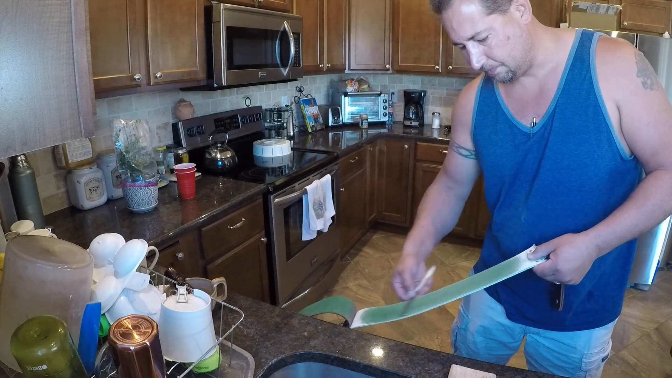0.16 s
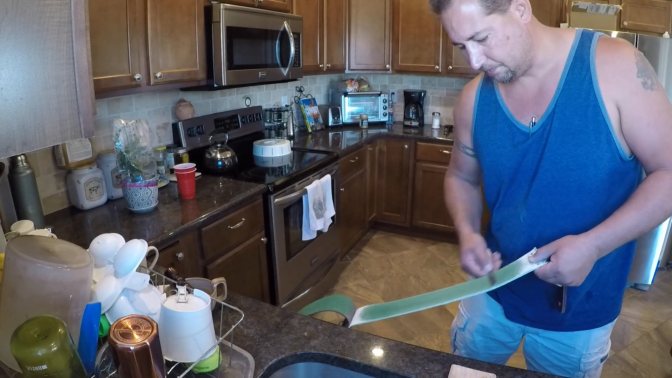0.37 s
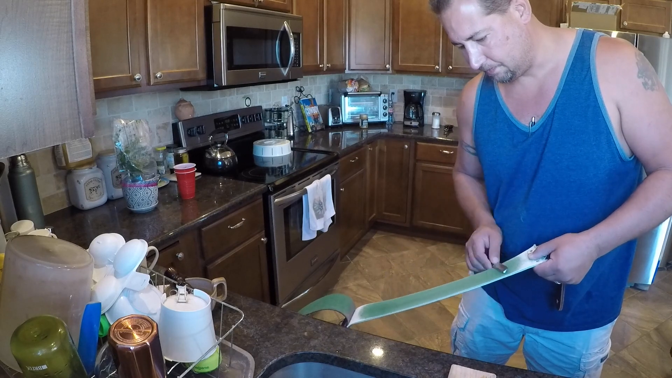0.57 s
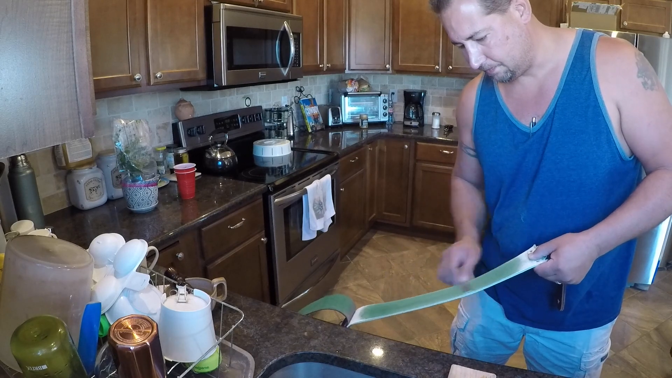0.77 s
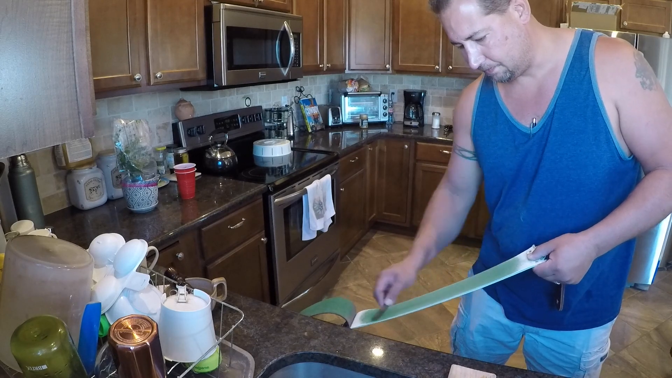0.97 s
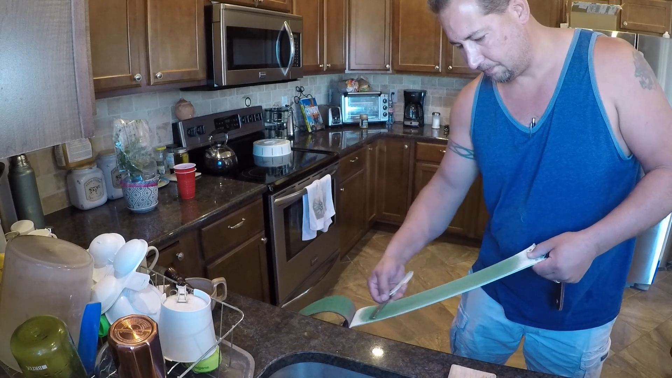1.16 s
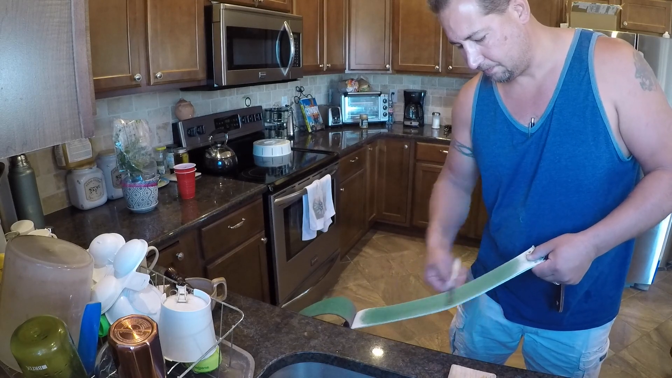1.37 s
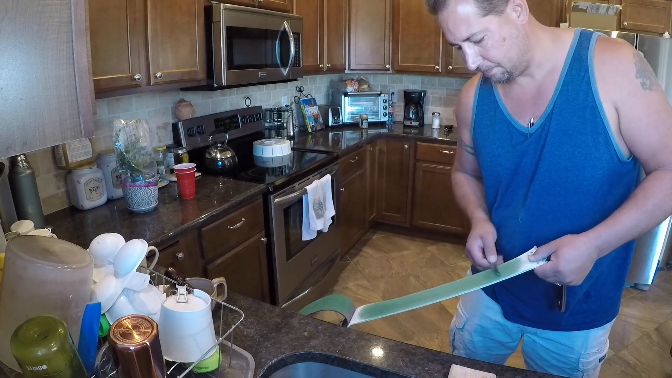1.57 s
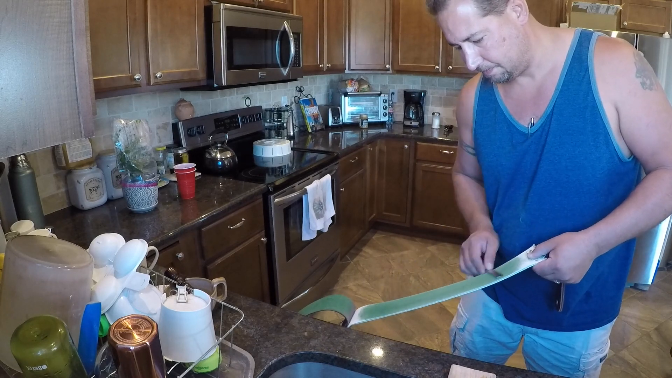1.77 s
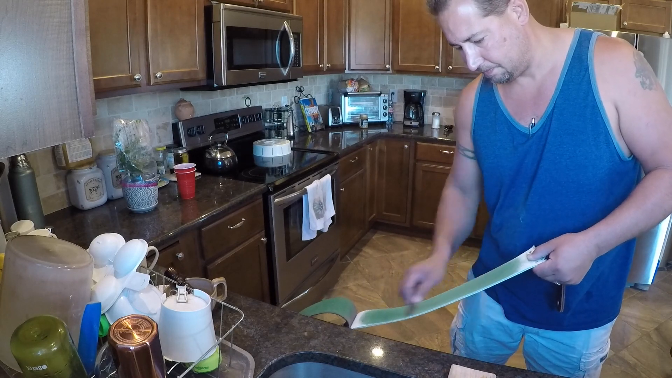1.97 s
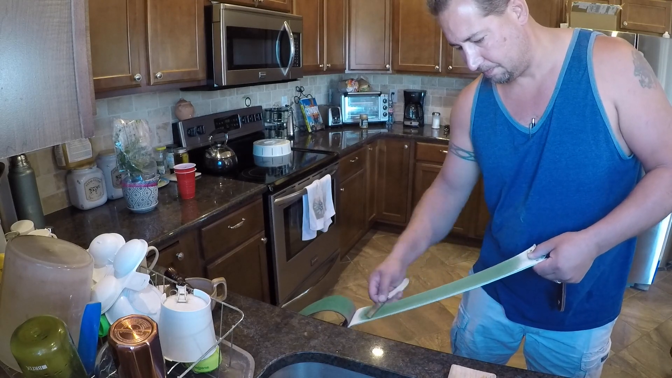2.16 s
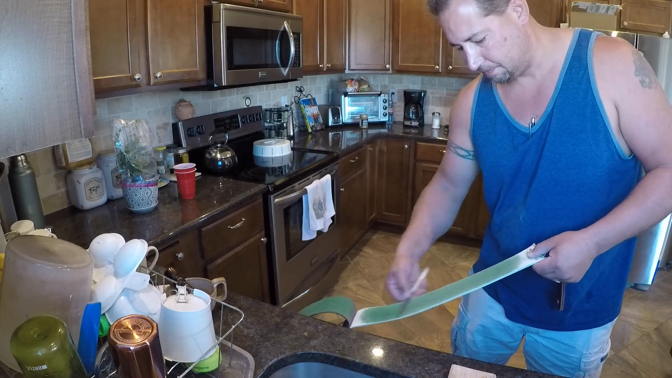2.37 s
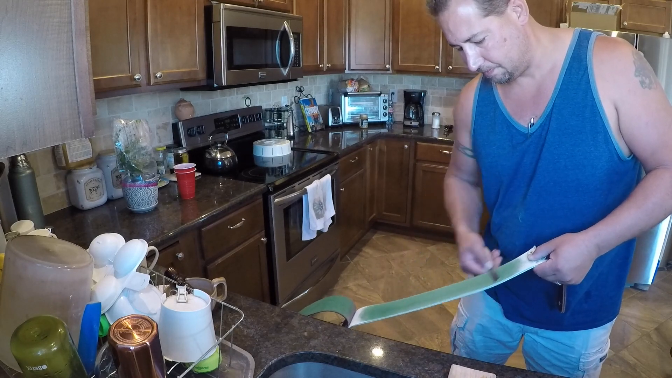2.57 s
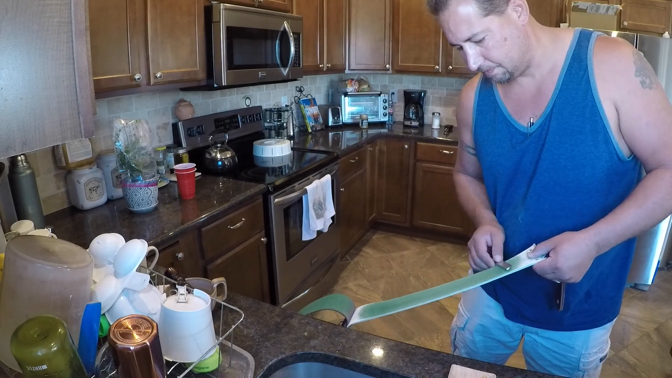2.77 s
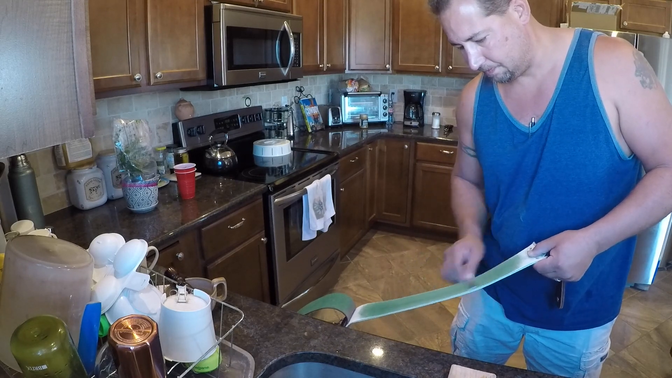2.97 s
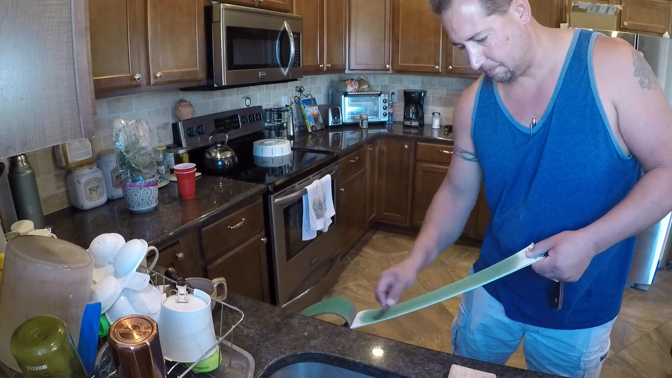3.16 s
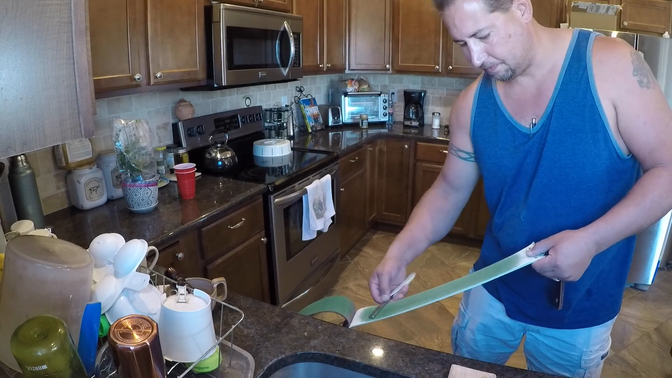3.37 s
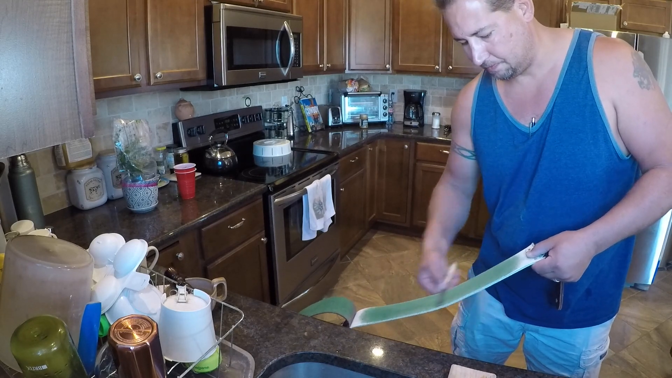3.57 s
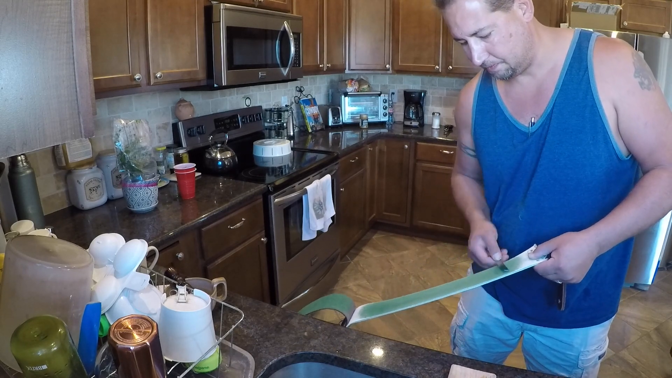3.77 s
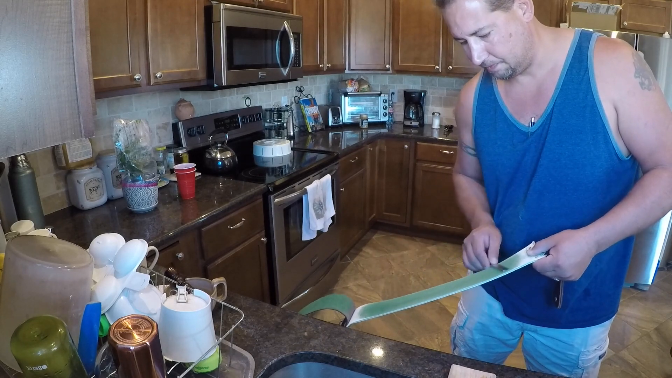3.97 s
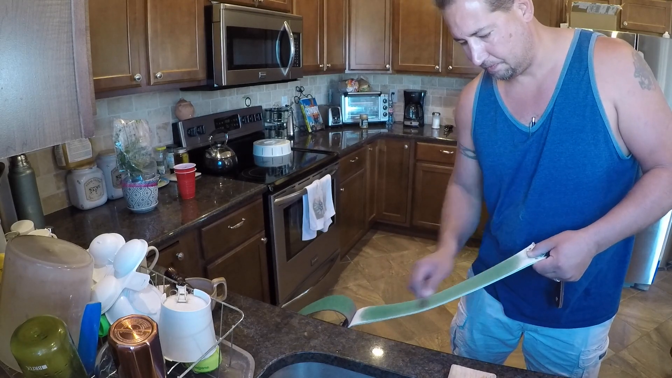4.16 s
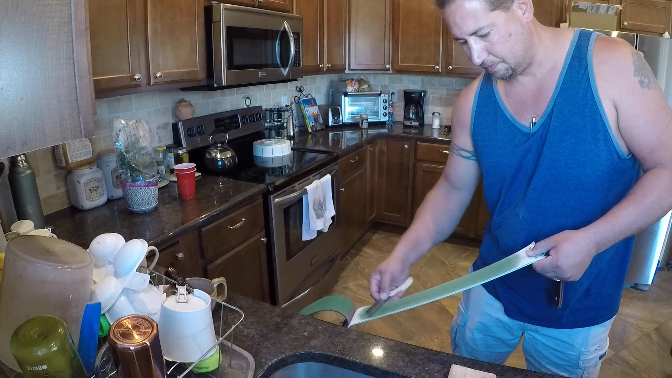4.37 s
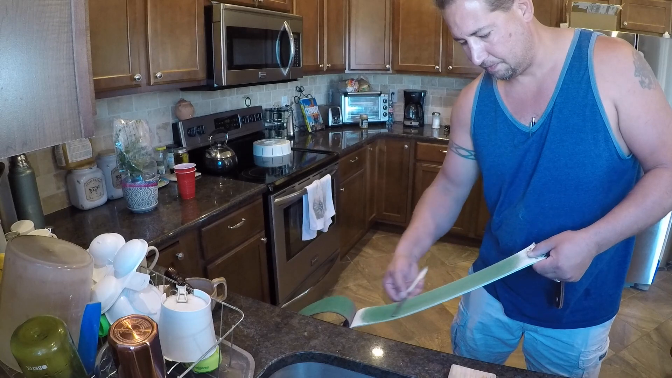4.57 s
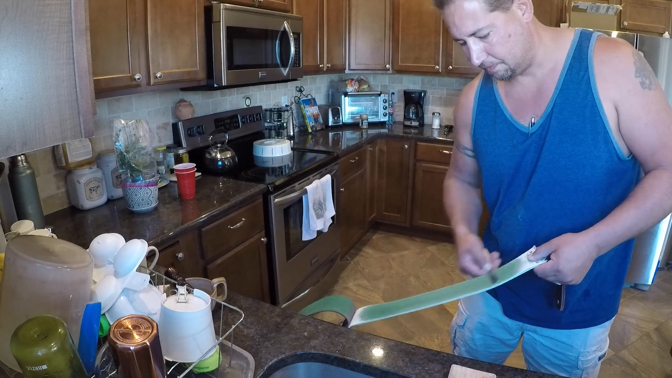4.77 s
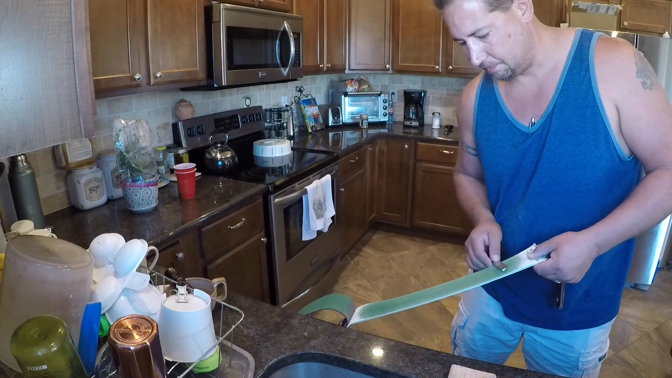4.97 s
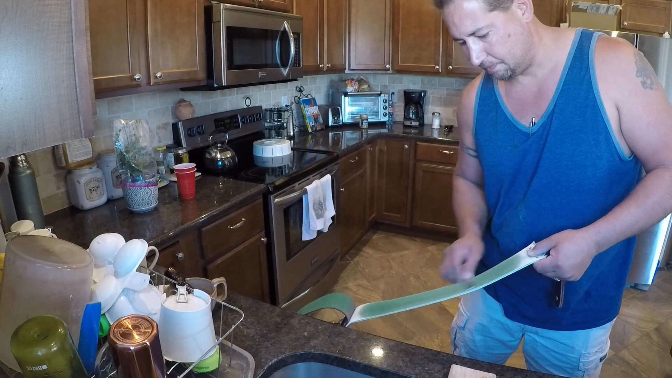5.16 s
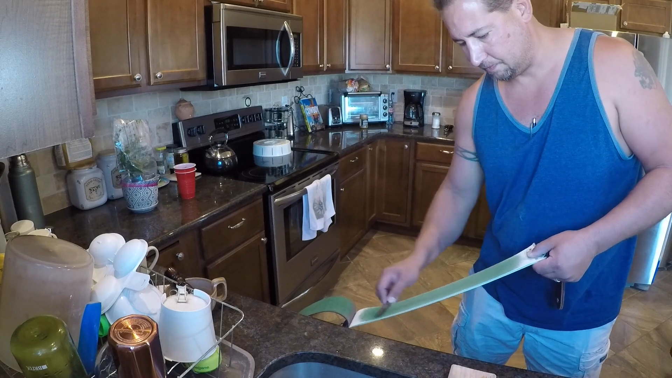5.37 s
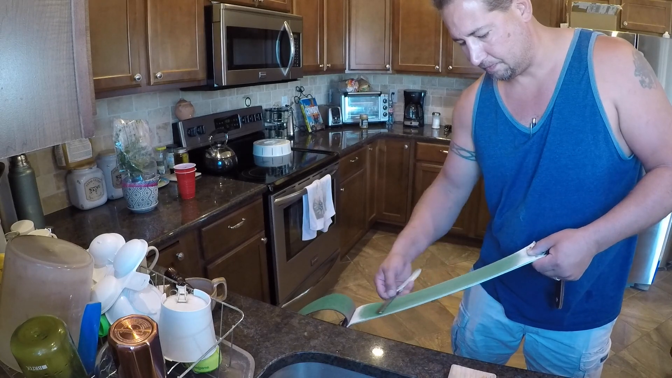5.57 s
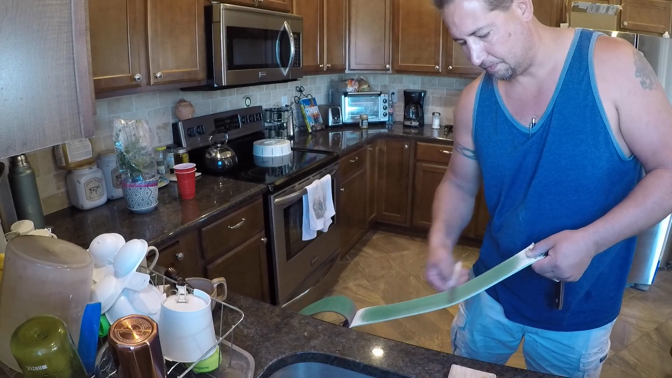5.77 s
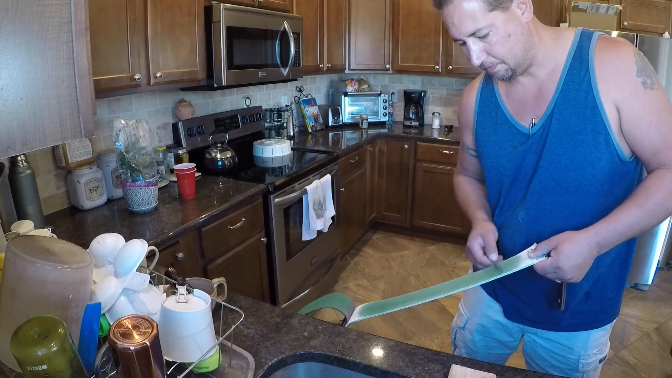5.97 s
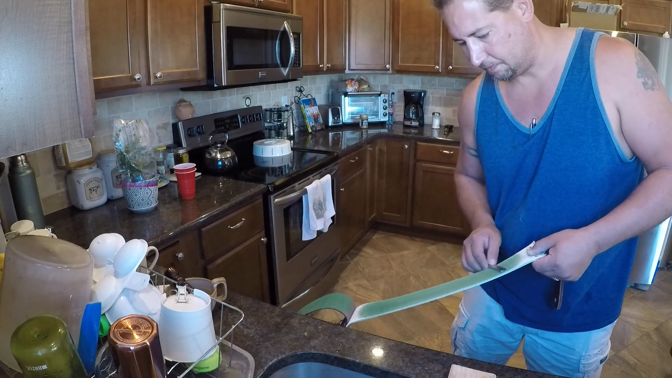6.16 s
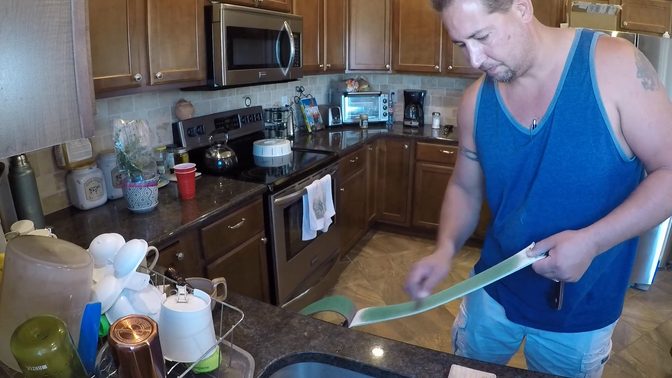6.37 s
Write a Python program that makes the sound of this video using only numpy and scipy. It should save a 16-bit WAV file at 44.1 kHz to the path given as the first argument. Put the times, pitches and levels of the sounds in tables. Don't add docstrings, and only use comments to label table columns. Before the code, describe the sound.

A straight razor is stropped on taut canvas in steady alternating strokes, raspy and hissing with short zips, in a humming hard-walled kitchen.

```python
import sys
import numpy as np
from scipy import signal
from scipy.fft import rfft, irfft, next_fast_len
from scipy.io import wavfile
from scipy.ndimage import uniform_filter1d

SR = 44100
rng = np.random.default_rng(int(sys.argv[2]) if len(sys.argv) > 2 else 0)


def wav_record(signal):
    frames = np.transpose(np.atleast_2d(signal))
    bounded = np.clip(frames, -1, 1)
    quanta = np.round(bounded * 32767).astype(np.int16)
    wavfile.write(sys.argv[1], SR, quanta)


def volts(x):
    e = np.asarray(x, float) / 20
    return 10 ** e


N = 283563
TIME = np.arange(N) / SR


def level(x, db):
    return x * volts(db) / np.sqrt(np.mean(x ** 2))


def along(table, hz):
    points = np.array(table, float)
    return np.interp(np.log(np.maximum(hz, 1)), np.log(np.maximum(points[:, 0], 1)), points[:, 1])


def colour(x, table, share=1):
    length = x.shape[-1]
    size = next_fast_len(length)
    gain = volts(share * along(table, np.fft.rfftfreq(size, 1 / SR)))
    return irfft(rfft(x, size) * gain, size)[..., :length]


def bands(x, count=16, low_hz=80):
    size = next_fast_len(len(x))
    centres = np.geomspace(low_hz, 15000, count)
    place = np.interp(np.log(np.fft.rfftfreq(size, 1 / SR) + 1), np.log(centres), np.arange(count))
    spectrum = rfft(x, size)
    split = []
    for k, hz in enumerate(centres):
        weight = np.clip(1 - abs(place - k), 0, 1)
        split.append((hz, irfft(spectrum * weight, size)[:len(x)]))
    return split


def walk(rate):
    hold = int(SR / rate)
    steps = np.repeat(rng.standard_normal(N // hold + 1), hold)
    return 1.3 * uniform_filter1d(uniform_filter1d(steps, hold), hold)[:N]


# frequency in Hz, density in dB per Hz.
AIR_MID = [(20, -15), (70, -34), (100, -27), (120, -18), (150, 6), (200, 5), (300, -3.5), (450, -6.5),
           (850, -14), (2600, -20.5), (4900, -26.5), (7200, -23.5), (10000, -26), (15000, -36.5)]
# frequency in Hz, density in dB per Hz.
AIR_SIDE = [(20, -21), (95, -34), (120, -11), (160, 7), (230, 2.5), (620, 0), (1240, -3.5), (2000, -12),
            (4300, -26), (7000, -19), (10800, -23), (12300, -41), (14500, -34)]


def air():
    layers = []
    for table, db in (AIR_MID, -51), (AIR_SIDE, -50.5):
        noise = level(colour(rng.standard_normal(N), table), db)
        layers.append(sum(volts(0.7 * walk(5)) * band for hz, band in bands(noise, count=7)))
    return layers


def motor_hum():
    hz = 57.2 * (1 + 0.045 * walk(10))
    return volts(-71.5 + 1.9 * walk(7.45)) * np.sin(2 * np.pi * np.cumsum(hz) / SR)


# frequency in Hz, decay by 60 dB in seconds.
KITCHEN = [(300, 0.38), (1000, 0.5), (2500, 0.33), (5000, 0.67), (10000, 0.33)]


def echo(x):
    t = TIME[:SR // 2]
    noise = rng.standard_normal(len(t))
    tail = sum(band * volts(-60 * t / along(KITCHEN, hz)) for hz, band in bands(noise, count=8))
    tail = tail * np.clip((t - 0.003) / 0.0026, 0, 1)
    return signal.fftconvolve(x, tail / np.sqrt(np.sum(tail ** 2)))[:N]


# frequency in Hz, gain in dB.
ECHO_MID = [(300, -4), (800, -1.5), (1600, 0), (2400, -2.5), (4000, -2), (8000, -6)]
# frequency in Hz, gain in dB.
ECHO_SIDE = [(200, -31), (500, -3), (1000, 1), (2000, 0), (4000, -5), (8000, -0.5), (12000, -7)]


def reflections(razor):
    wall = np.concatenate([np.zeros(int(0.03 * SR)), razor])[:N]
    mid = colour(volts(-10) * wall + echo(razor), ECHO_MID)
    return mid, volts(-1.5) * colour(echo(razor), ECHO_SIDE)


# frequency in Hz, gain in dB.
BEAM = [(300, -4), (800, -2.5), (1600, -5.5), (2400, 2.5), (4000, 1), (8000, -4)]


def direct(razor):
    return colour(razor, BEAM)


# landing in seconds, start of unloading
# in seconds, gliding level in dB, level of the final dig in dB, top pitch of the rasp in Hz.
STROKES = [(.04, .324, -42, -42.5, 1080), (.62, .83, -49, -31, 1300), (1.16, 1.43, -41, -41.5, 1160),
           (1.71, 1.946, -44, -33.5, 1590), (2.27, 2.512, -44, -34.5, 1250), (2.82, 3.05, -44.5, -34, 1320),
           (3.39, 3.654, -38, -44.5, 1254), (3.94, 4.162, -44.5, -34, 1190), (4.49, 4.73, -42, -35, 1443),
           (5.02, 5.235, -44.5, -34, 1620), (5.61, 5.835, -39.5, -42.5, 1150),
           (6.12, 6.35, -43.5, -33, 1600)]
# part (0 = landing, 1 = unloading), rasp in dB relative to gliding level,
# share of the dig 0-1, edge hiss in dB, dullness in dB per octave.
AWAY = [
    (0, -24, 0.2, -82, -1),
    (.2, -12, 0.1, -64.5, 6.5),
    (.45, -2, 0.3, -56, 3),
    (.7, 1, 0.45, -54.5, 2.5),
    (.88, 0, 0.88, -54.5, -0.5),
    (1, 0, 1, -64, 2),
    (1.2, -22, 0, -91, 20),
]
BACK = [
    (0, -28, 0, -75, -3),
    (.3, -9.5, 0.22, -60.5, 2.5),
    (.7, -0.5, 0.076, -53.5, 2),
    (.84, 2, 0.47, -55.5, 4),
    (.92, 1.5, 0.78, -53, -3),
    (1, 0, 1, -52.5, -2.5),
    (1.2, -12.5, 0.18, -59.5, 19),
]


def course(k):
    lands, unloads, glide_db, dig_db, top_hz = STROKES[k]
    part, under_db, share, hiss_db, dull = np.array(BACK if k % 2 else AWAY, float).T
    seconds = lands + part * (unloads - lands)
    rasp_db = glide_db + under_db + share * (dig_db - glide_db)
    landing_hz, full_speed_part = 830, 0.65
    pitch = landing_hz + (top_hz - landing_hz) * np.clip(part / full_speed_part, 0, 1)
    return np.c_[seconds, rasp_db, hiss_db, dull, pitch]


def contact(axis):
    rows = np.concatenate([course(k) for k in range(len(STROKES))])
    return np.interp(TIME, rows[:, 0], rows[:, axis])


def touching():
    on = np.zeros(N)
    for k in range(len(STROKES)):
        seconds = course(k)[:, 0]
        on += (TIME > seconds[0]) & (TIME < seconds[-1])
    return uniform_filter1d(on, SR // 66)


def fibres(grain_db):
    return rng.standard_normal(N) * volts(grain_db * rng.exponential(size=N))


# multiple of the rib rate, level in dB.
RIBS = [(1, 1.5), (1.5, -5.5), (2, 6.5), (2.5, -1.5), (3, 0.5), (3.5, -15), (4, -8.5), (4.5, -10.5),
        (5, -14), (6, -22)]
# start in seconds, length in seconds,
# middle rib rate in Hz, level in dB, sharpness in dB per octave.
AWAY_ZIPS = [(.265, 0.036, 723, -49, -6), (.3, 0.028, 516, -44, -15), (.338, 0.038, 439, -51, -19),
             (1.363, 0.078, 701, -46.5, -11), (1.403, 0.0515, 611, -43.5, -4),
             (2.459, 0.033, 785, -37.5, -5), (2.499, 0.059, 708.4, -45.5, -2.5),
             (3.587, 0.032, 728, -46, -2.5), (3.622, .03, 655, -45, -17), (3.635, 0.056, 597, -47.5, -1),
             (3.665, 0.035, 426, -50, -9), (4.679, 0.024, 776, -35.5, -4.5),
             (4.711, 0.058, 730.5, -45.5, -2.5), (5.75, 0.033, 794, -42.5, -9),
             (5.795, 0.023, 665, -39.5, -18), (5.818, 0.04, 587, -51.5, -3.5),
             (5.835, 0.025, 434, -42, -11.5)]
BACK_ZIPS = [(.803, 0.085, 715, -39.5, -5), (1.915, 0.05, 758.4, -40, -2.5), (3.02, 0.048, 793, -35, -4.5),
             (4.128, 0.058, 797, -36, -3.5), (5.204, 0.058, 777.6, -41, -0.5),
             (6.323, 0.063, 775, -41.5, 0.5)]


def zips():
    out, wobble, uneven = np.zeros(N), walk(150), volts(1.5 * walk(90))
    for runs, sag_hz_per_s in (AWAY_ZIPS, 1340), (BACK_ZIPS, 124):
        for start, length, hz, db, sharp_db in runs:
            span = slice(int(start * SR), min(int((start + length) * SR), N))
            part = (TIME[span] - start) / length
            slowing_hz = hz - sag_hz_per_s * length * (part - 0.5)
            phase = 2 * np.pi * np.cumsum(slowing_hz * (1 + 0.022 * wobble[span])) / SR
            tilt_db = sharp_db + 5.0 - 10.8 * part
            stack = sum(volts(d + tilt_db * np.log2(k)) * np.cos(k * phase + k * k) for k, d in RIBS)
            swell = np.sin(np.pi * abs(part)) ** 1.24
            out[span] += volts(db) * swell * uneven[span] * stack
    return out


# frequency in Hz, density in dB per Hz.
HISS = [(2060, -19), (3500, -3), (4830, -10.5), (6240, -5), (6840, 0.5), (9110, -13.5), (11200, -18),
        (11900, -11.5), (13600, -12.5), (15000, -30)]


def hiss():
    edge = level(colour(fibres(2.6), HISS), -0.83)
    return edge * volts(contact(axis=2) + 0.17 * walk(30)) * touching()


# frequency in Hz, density in dB per Hz.
RASP = [(120, -80), (220, -35), (330, -4.5), (450, -4), (750, 0), (1100, 3), (1500, -0.5), (2300, 0.5),
        (3200, -12.5), (4800, -21), (6000, -60), (8000, -58)]


def rasp():
    dull, pitch = contact(axis=3), np.log2(contact(axis=4))
    slips = level(colour(fibres(1.3), RASP), -7.0)
    out = 0
    for hz, band in bands(slips, count=15, low_hz=382):
        bump_db = 5 * np.exp(-((np.log2(hz) - pitch) / 0.2) ** 2)
        tilt_db = -dull * np.log2(hz / 1300)
        out = out + volts(1.5 * walk(22) + bump_db + tilt_db) * band
    return out * volts(contact(axis=1)) * touching()


def scene():
    razor = rasp() + hiss() + zips()
    hum = motor_hum()
    air_mid, air_side = air()
    echo_mid, echo_side = reflections(razor)
    mid = direct(razor) + echo_mid + air_mid + hum
    side = echo_side + air_side + volts(-25) * hum
    return np.array([mid + side, mid - side])


# frequency in Hz, left minus right in dB.
PORTS = [(60, -5), (110, 2), (200, -1.5), (370, 1), (690, -2), (1270, -1), (2330, -1.5), (4300, 0),
         (7910, -3.5), (14600, -1)]


def microphones(dry):
    return np.array([colour(dry[0], PORTS, share=0.5), colour(dry[1], PORTS, share=-0.5)])


def top_cut(x):
    return signal.sosfilt(signal.butter(12, 15160, fs=SR, output="sos"), x)


def record(dry):
    mix = microphones(dry)
    return top_cut(mix)


dry = scene()
out = record(dry)
wav_record(out)
```